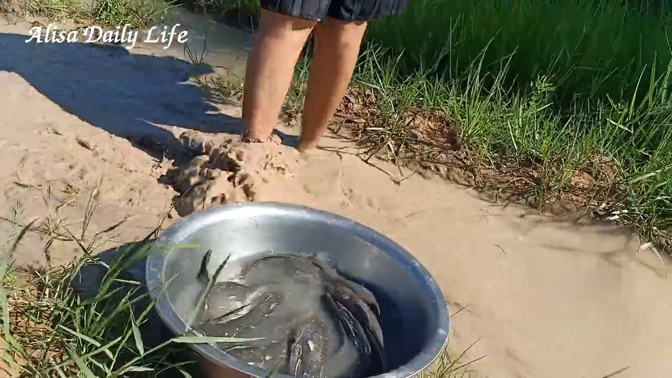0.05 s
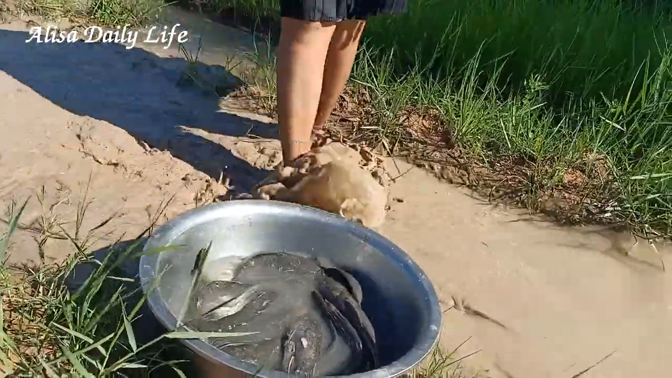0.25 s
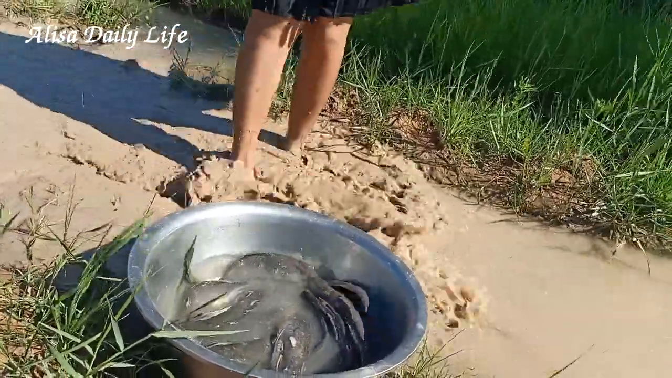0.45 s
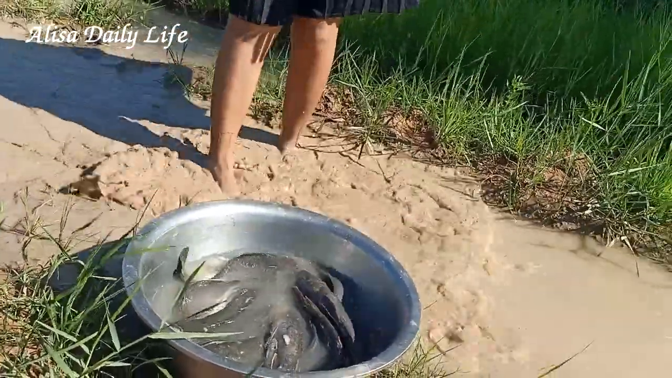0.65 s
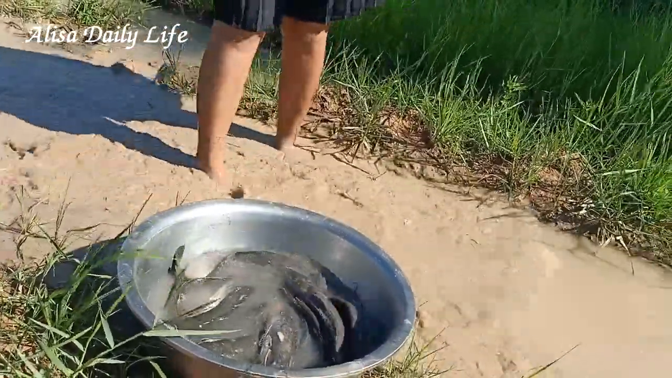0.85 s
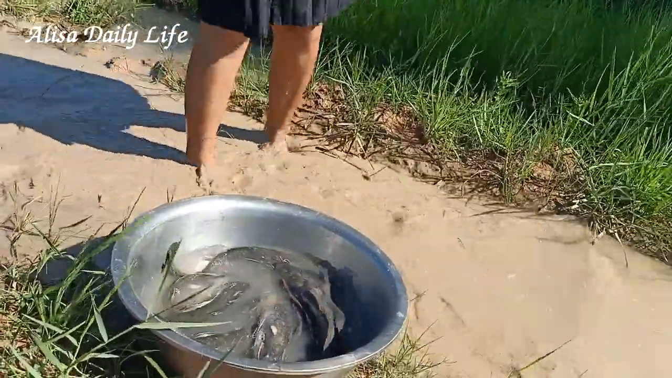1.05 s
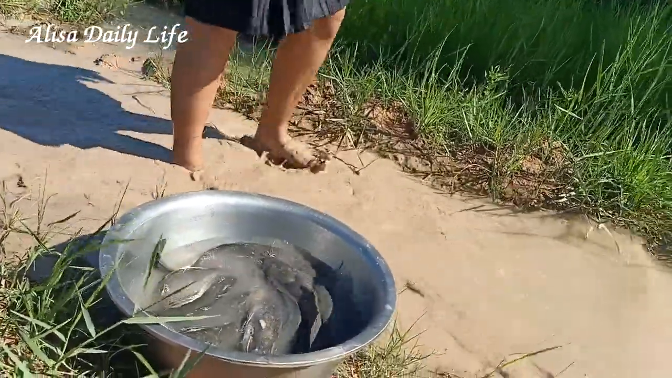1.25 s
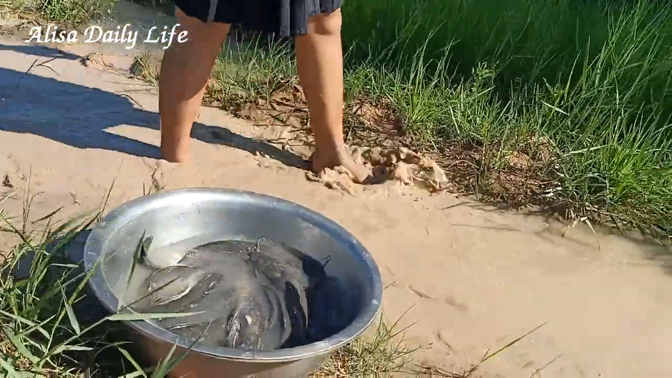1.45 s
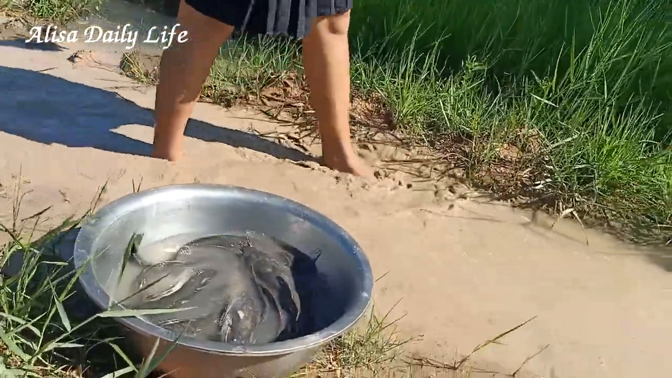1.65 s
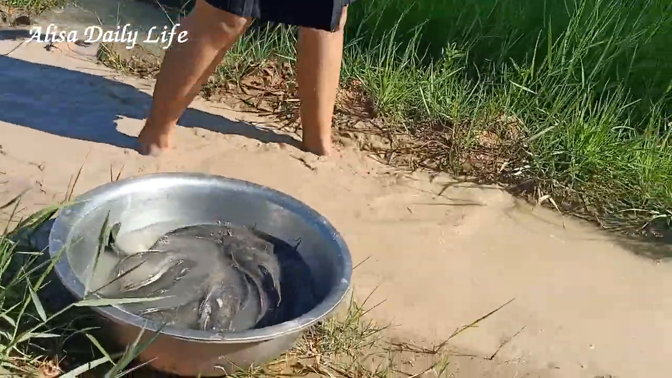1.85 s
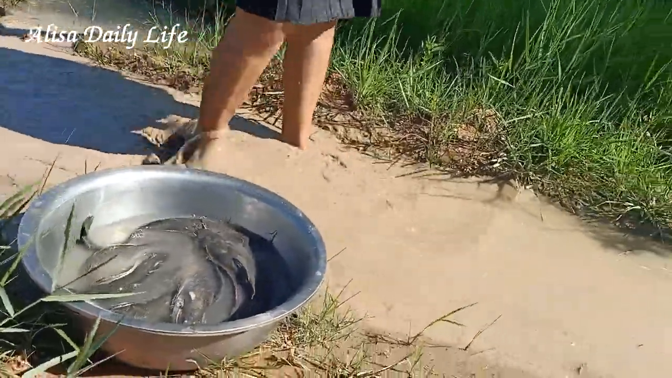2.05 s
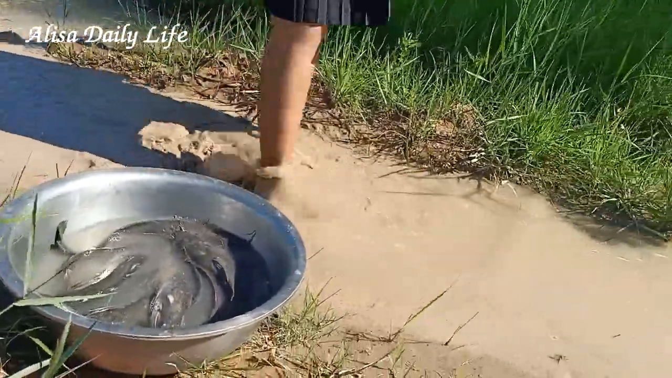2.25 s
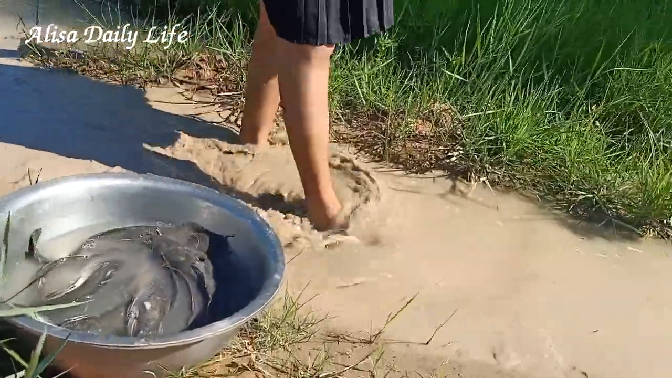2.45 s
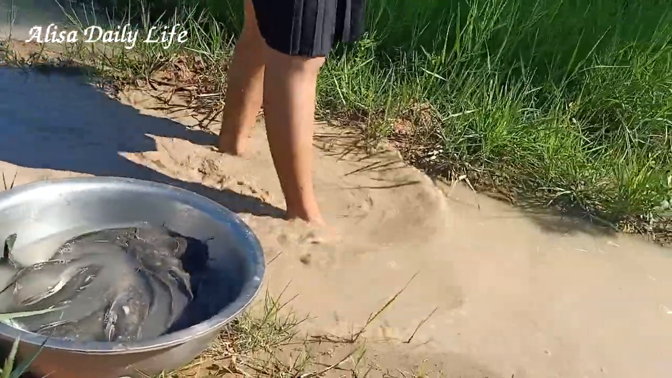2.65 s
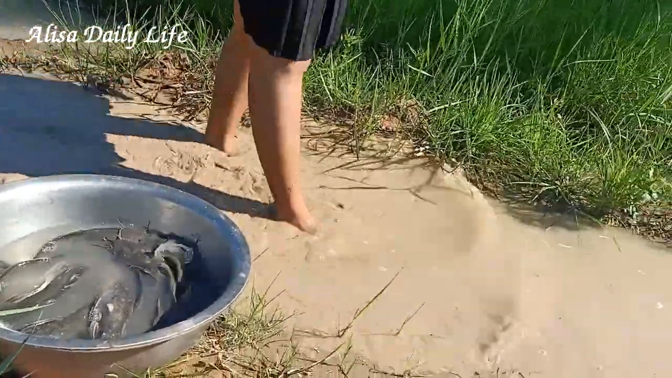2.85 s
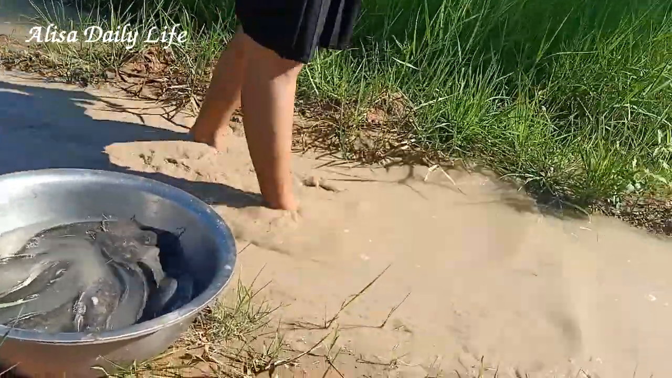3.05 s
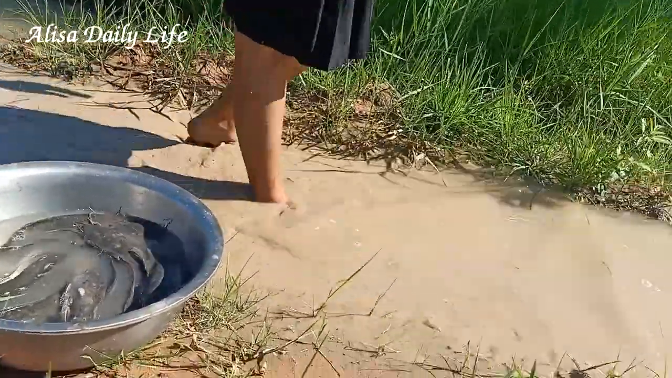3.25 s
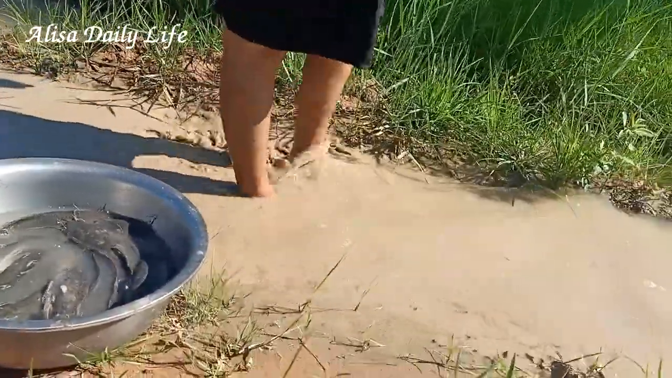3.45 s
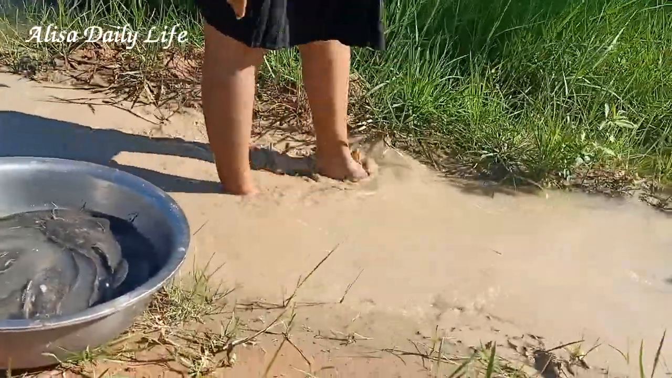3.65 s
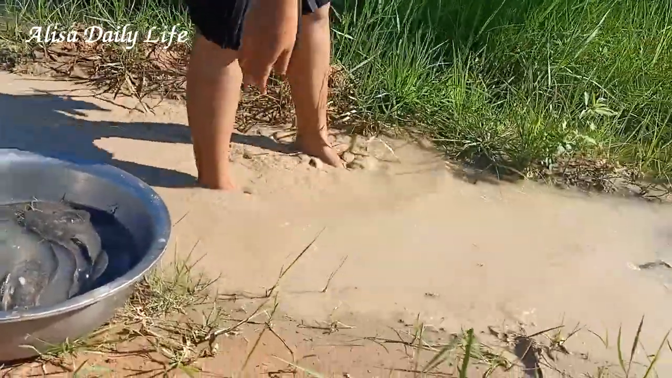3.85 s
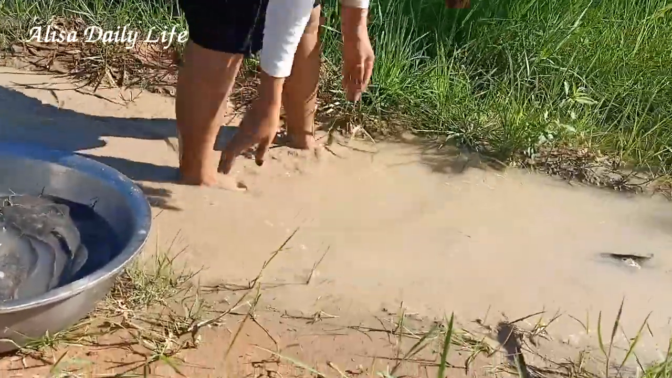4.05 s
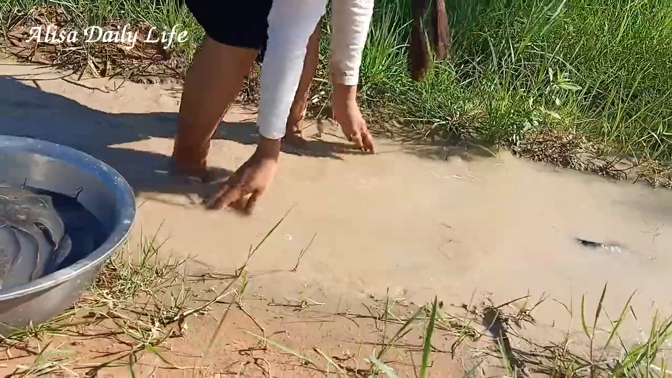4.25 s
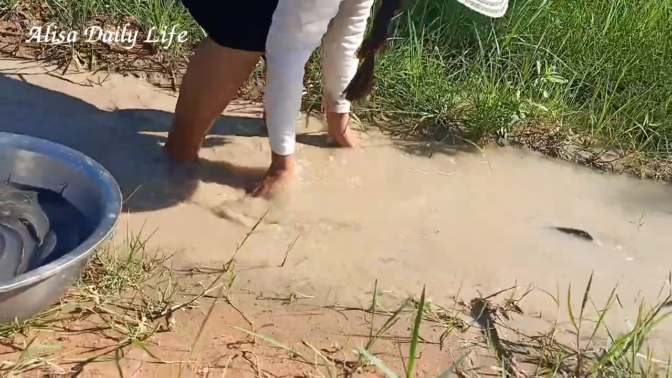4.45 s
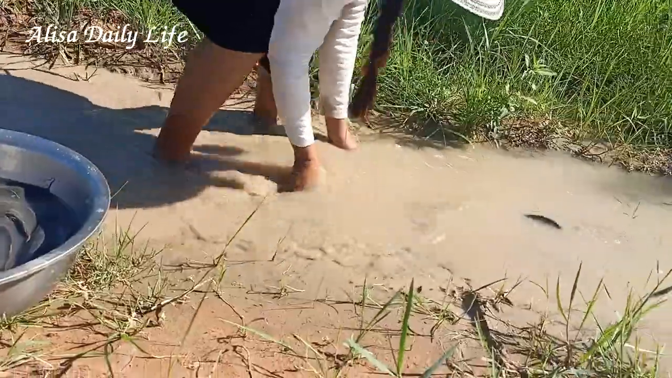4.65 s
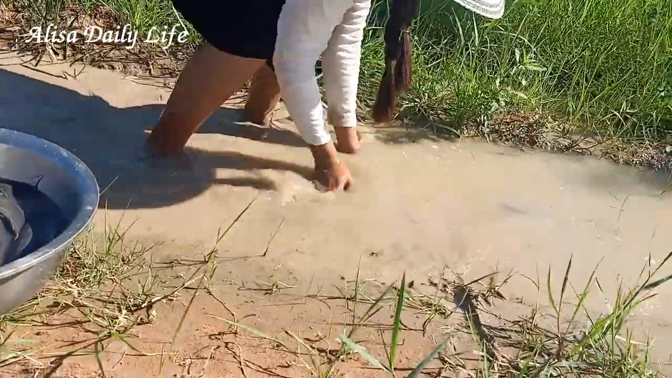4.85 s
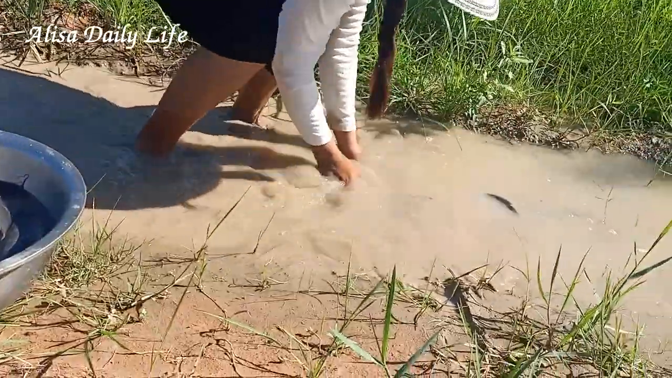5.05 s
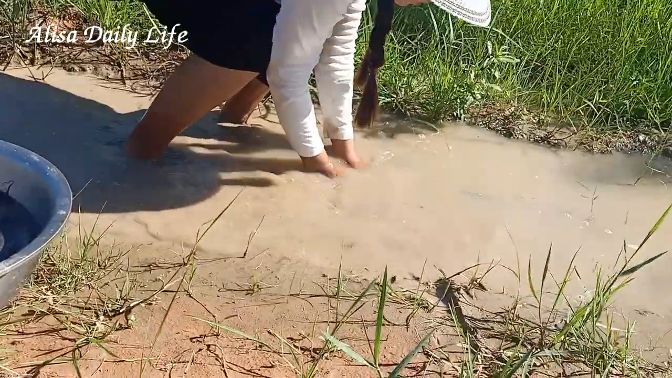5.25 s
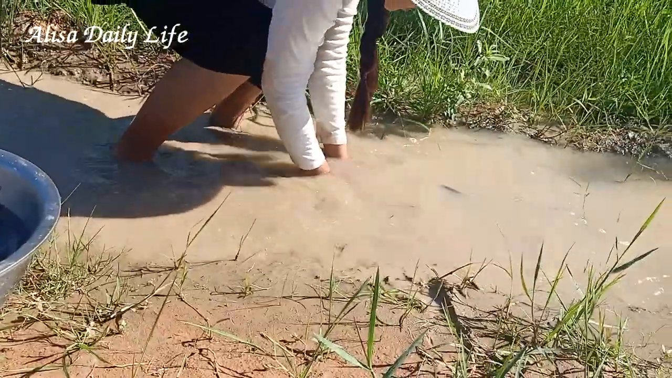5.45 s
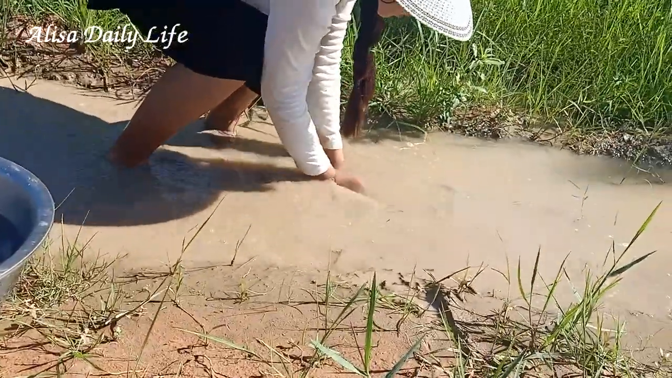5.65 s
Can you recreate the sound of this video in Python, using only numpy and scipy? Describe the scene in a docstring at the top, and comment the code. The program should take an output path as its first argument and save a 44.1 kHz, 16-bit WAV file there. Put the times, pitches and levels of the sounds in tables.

```python
"""Wading in a muddy pool, windy field

Bare feet wade through shallow water, then hands dip in and grope along the bottom.
Strokes swell bubble swarms and noise; plops are rising sine rings, smacks are noise bursts through
resonators, gurgles are sine glides. Random pressure spikes make the wind that buffets the single
microphone, over a filtered-noise background hiss. All of it plays in the right channel only."""
import sys
import numpy as np
from scipy import signal
from scipy.fft import rfft, irfft
from scipy.io import wavfile
from scipy.ndimage import uniform_filter1d

SR = 44100
rng = np.random.default_rng(int(sys.argv[2]) if len(sys.argv) > 2 else 0)


def to_wav(sig):
    """Store sig (one row per channel, or 1-D mono) as 16-bit WAV at the path in sys.argv[1].

    Samples outside -1..1 are clipped; the rate is SR.
    """
    pcm = np.clip(np.atleast_2d(sig), -1, 1) * 32767
    pcm = np.round(pcm).astype(np.int16)
    wavfile.write(sys.argv[1], SR, pcm.T)  # frames by channels


N = 251851
TIME = np.arange(N) / SR  # [s]

# All levels in the tables are mix levels, ahead of layer trims, filters and output gain.


def undb(db):
    """Decibels to gain."""
    return 10 ** (np.asarray(db) / 20)


def unit(x):
    """Scale to rms 1."""
    return x / np.sqrt(np.mean(x ** 2))


def curves(table):
    """Each column of a control table, sample by sample."""
    s, *columns = np.transpose(table)
    return [np.interp(TIME, s, column) for column in columns]


def colour(x, points):
    """Filter by a (frequency [Hz], gain [dB]) outline that falls away steeply beyond its ends."""
    hz, db = np.transpose(points)
    f = np.maximum(np.arange(N // 2 + 1) * SR / N, 1)
    skirts = np.minimum(f / hz[0], 1) ** 3 * np.minimum(hz[-1] / f, 1) ** 4
    gain = undb(np.interp(np.log(f), np.log(hz), db)) * skirts
    return irfft(rfft(x) * gain, N)


def steady(x, span_s):
    """Take out swells slower than span_s, keep the grain."""
    size = max(int(span_s * SR), 1)
    power = uniform_filter1d(uniform_filter1d(x ** 2, size), size)
    return x / np.sqrt(np.abs(power) + 1e-12)


def walk(rate):
    """Smooth random wander with rate new targets a second, spread near 1."""
    k = int(SR / rate)
    steps = np.repeat(rng.standard_normal(N // k + 1), k)
    return unit(uniform_filter1d(steps, k)[:N])


def add(out, s, sound):
    """Mix a short sound in at time s."""
    i = int(np.clip(s * SR, 0, N - 1))
    out[i:i + len(sound)] += sound[:N - i]


def gate(start, end, attack_s, release_s):
    """Swell exponentially up to start, hold until end, die away."""
    return np.exp(np.minimum(TIME - start, 0) / attack_s - np.maximum(TIME - end, 0) / release_s)


# outline of the background hiss: (frequency [Hz], gain [dB])
HISS_COLOUR = [(35, -10), (60, -3), (105, 1.5), (175, -31), (298, -24.5), (1120, -32.5), (2360, -26.5),
               (3270, -31.5), (4420, -34.5), (5840, -23), (7900, -44.5), (9080, -39.5), (9970, -47.5),
               (13500, -44.5), (15500, -46)]


def background_hiss():
    """A faint, nearly even background hiss: filtered noise, levelled by its treble."""
    hiss = colour(rng.standard_normal(N), HISS_COLOUR)
    treble = colour(hiss, [(1000, 0), (15000, 0)])
    return hiss / treble.std() * undb(-62.5 + 0.65 * walk(7.5))


def vortex(hz):
    """A pressure spike between two shallow dips."""
    u = (np.pi * hz * np.arange(-600, 601) / SR) ** 2
    return (1 - 2 * u) * np.exp(-u)


def eddies(count, low_hz, high_hz, spread_db):
    """Vortices of many sizes and either sign pass at random moments."""
    out = np.zeros(N)
    for when, pitch, size, side in rng.random((count, 4)):
        hz = low_hz * (high_hz / low_hz) ** pitch
        db = -spread_db * np.log(size + .05)
        add(out, when * N / SR, np.sign(side - .5) * undb(db) * vortex(hz))
    return unit(out)


# the breeze between gusts, with its lulls: (time [s], level [dB])
BREEZE_LEVEL = [(0, -33.5), (.9, -38), (1.15, -40), (1.4, -38.5), (2.1, -38.5), (2.25, -43.5), (2.7, -43),
                (3.28, -41), (3.31, -66), (3.41, -73), (3.45, -40), (3.9, -47), (4.2, -56), (4.66, -59),
                (4.95, -46), (5.27, -43), (5.31, -79), (5.71, -60)]
# gusts: (start [s], hold [s], level [dB], fine eddies relative to the gust [dB])
GUST_EVENTS = [(.01, 0.068, -25.5, -16), (.14, 0.15, -24, -11), (0.301, .11, -34, -2),
               (0.589, 0.1, -27.5, -6), (0.735, 0.017, -27, -5), (0.838, .09, -31, -4),
               (1.268, .15, -29.5, -9), (1.446, .15, -29.5, -9.5), (1.668, 0.026, -32, -14.5),
               (1.874, 0.021, -25, -15.5), (1.963, 0.18, -31.5, -15.5), (2.28, 0.14, -43, -16),
               (2.457, 0.081, -33, -14), (2.661, 0.052, -29.5, -14.5), (2.805, 0.053, -34.5, -13),
               (3.431, 0.037, -36, -3.5), (3.588, .10, -35, -12.5), (3.789, 0.031, -32, -10),
               (3.883, 0.021, -31, -17), (3.994, 0.12, -42.5, -17.5), (4.718, 0.046, -40, -20.5),
               (4.879, .03, -37.5, -12.5), (4.956, 0.086, -36.5, -14), (5.098, 0.058, -35.5, -19),
               (5.41, 0.043, -34, -21), (5.507, 0.17, -33.5, -9)]


def blowing():
    """Strength of the big and of the fine eddies: gust power rides on the breeze."""
    big = undb(curves(BREEZE_LEVEL)[0]) ** 2
    fine = big * undb(-24) ** 2
    for s, hold, db, fine_db in GUST_EVENTS:
        power = (undb(db) * gate(s, s + hold, attack_s=.012, release_s=.016)) ** 2
        big = big + power
        fine = fine + power * undb(fine_db) ** 2
    return np.sqrt(big), np.sqrt(fine)


# outline of the big-eddy rumble: (frequency [Hz], gain [dB])
RUMBLE_COLOUR = [(15, -48), (25, -23), (46, -4.5), (65, 0.5), (130, -1), (174, -4), (243, -6.5),
                 (354, -15.5), (390, -16), (442, -32), (700, -51), (910, -94), (1540, -120)]
# single hard eddies: (centre time [s], level [dB], pitch [Hz])
BUFFET_EVENTS = [(0.0218, -20, 233), (0.1617, -10.5, 343), (0.1735, -11, 221), (0.2517, -19, 133),
                 (.632, -14, 120), (0.639, -20.5, 447), (0.663, -15, 500), (0.6733, -12, 343),
                 (.742, -21, 402), (0.838, -13, 386), (0.886, -25.5, 406), (0.8941, -15, 185.4),
                 (1.276, -24.5, 367), (1.3402, -17.5, 250), (1.4908, -20.5, 445), (1.544, -26.5, 394),
                 (1.5928, -25, 150), (1.6968, -23.5, 213), (1.8955, -18.5, 89), (2.1203, -19.5, 218),
                 (2.5125, -30, 320), (2.6801, -23, 318), (2.688, -26.5, 390), (3.1156, -19.5, 164),
                 (3.481, -23.5, 186), (3.791, -30, 206), (3.902, -21, 204), (4.975, -22, 217),
                 (5.0131, -21.5, 293), (5.5073, -19, 180), (5.55, -36, 494), (5.593, -31.5, 378),
                 (5.6451, -19, 203)]


def wind():
    """Big eddies rumble on the microphone; small ones flutter over them; the hardest are single thuds."""
    big, fine = blowing()
    rumble = eddies(count=1500, low_hz=87.6, high_hz=265, spread_db=3.5)
    rumble = steady(colour(rumble, RUMBLE_COLOUR), 0.024)
    flutter = eddies(count=1500, low_hz=171, high_hz=374, spread_db=8)
    flutter = colour(flutter, [(200, -11.5), (330, -1), (500, 1.0), (700, -2.0), (1200, 0)])
    flutter = steady(flutter, 0.11)
    out = undb(0.94) * big * rumble + undb(-1.5) * fine * flutter
    for s, db, hz in BUFFET_EVENTS:
        thud = vortex(hz)
        add(out, s - len(thud) / 2 / SR, undb(db - 0.5) * thud)
    return out


def stroke(start, crest, end, shape):
    """A wave builds to its crest, sags and collapses, leaving a wake that settles slowly."""
    climb_db, sag_db, wake_db, wake_s = shape
    wave_db = np.interp(TIME, [start, crest, end], [-climb_db, 0, -sag_db])
    wave = undb(wave_db) * gate(start, end, attack_s=.02, release_s=.051)
    wake = undb(wake_db) * gate(start, end, attack_s=.095, release_s=wake_s)
    return np.hypot(wave, wake)


# a leg or hand sweeps through the water:
# (start [s], crest [s], end [s], churn level [dB], spray level [dB], finest-droplet mist level [dB])
STROKE_EVENTS = [(0.014, 0.039, 0.22, -42, -44, -57), (0.204, 0.355, 0.54, -34.5, -40.5, -51),
                 (1.361, 1.611, 1.76, -48, -47.5, -59.5), (2.174, 2.343, 2.506, -42, -46.5, -59),
                 (2.805, 2.896, 2.99, -57.5, -55.5, -71), (3.189, 3.27, 3.4, -53.5, -64, -77.5),
                 (3.417, 3.514, 3.67, -44, -50, -62.5), (4.363, 4.39, 4.43, -59.5, -51, -63),
                 (4.518, 4.58, 4.62, -62.5, -72, -79), (4.778, 4.8, 4.82, -54.5, -61, -82)]
# stroke shapes: (climb to crest [dB], sag after crest [dB], wake level [dB], wake decay constant [s])
CHURN_STROKE = (7, 5, -11, 0.4056)
SPRAY_STROKE = (6.5, 4.5, -12, 0.34)
MIST_STROKE = (12, 3.5, -11.5, .5)
CHURN_LAG_S = .025  # the churn peaks after the spray, as the wave falls back
SURGE_DB, SURGE_RATE = 1.2, 22  # the water moves unevenly (spread [dB], new targets per s)


def stirring():
    """Levels of churn, spray and mist in dB: the powers of all strokes add, under one shared surge."""
    power = 1e-12
    for start, crest, end, churn_db, spray_db, mist_db in STROKE_EVENTS:
        churn_crest = min(crest + CHURN_LAG_S, end)
        churn = undb(churn_db) * stroke(start, churn_crest, end, CHURN_STROKE)
        spray = undb(spray_db) * stroke(start, crest, end, SPRAY_STROKE)
        mist = undb(mist_db) * stroke(start, crest, end, MIST_STROKE)
        power = power + np.array([churn, spray, mist]) ** 2
    return 10 * np.log10(power) + SURGE_DB * walk(SURGE_RATE)


def bubble(hz, t60, rise):
    """A ring that swells within a cycle, then dies while its pitch climbs toward the surface."""
    t = np.arange(int(t60 * SR) + 2) / SR
    envelope = (1 - np.exp(-2 * hz * t)) * np.exp(-np.log(1000) * t / t60)
    # pitch climbs by the fraction rise over t60
    return np.sin(2 * np.pi * hz * t * (1 + rise * t / t60 / 2)) * envelope


def swarm(stir_db, count, low_hz, high_hz, cycles, spread_db, rise):
    """Bubbles at random moments, a crowd in stirred water and few in calm; spread_db sets how some stand out."""
    out = np.zeros(N)
    chance = undb(.7 * (stir_db - stir_db.max()))
    for when, pitch, size, ring, luck in rng.random((count, 5)):
        if luck < chance[int(when * N)]:
            hz = low_hz * (high_hz / low_hz) ** pitch
            db = -spread_db * np.log(size + .03)
            t60 = cycles * (.5 + ring) / hz
            add(out, when * N / SR, undb(db) * bubble(hz, t60, rise))
    # lift the sparse stretches, so crowding changes grain more than level
    return unit(out * np.maximum(chance, .1) ** -.5)


# outlines of the three water layers: (frequency [Hz], gain [dB])
CHURN_OUTLINE = [(350, -3), (540, -5.5), (900, -2), (1200, -3), (1500, -4), (2100, 1.5), (2800, 3),
                 (3300, -3), (4500, 1.5)]
SPRAY_OUTLINE = [(2200, 4.5), (3200, -10), (4200, -7), (5000, -6.5), (5800, 4.5), (6500, -5), (7500, -14),
                 (10000, -21)]
MIST_OUTLINE = [(6000, 10.5), (8000, -5), (10500, -7), (12500, -2), (13800, -1), (15500, 0)]


def slosh():
    """The wave ahead of each leg churns up bubbles; its spray patters back as tiny ones over a fine hiss."""
    churn_db, spray_db, mist_db = stirring()
    foam = rng.standard_normal((3, N))
    churn = swarm(churn_db, count=16000, low_hz=480, high_hz=3600, cycles=26, spread_db=4.5, rise=.2)
    spray = swarm(spray_db, count=14000, low_hz=2898, high_hz=7830, cycles=52, spread_db=6.0, rise=0.096)
    mist = swarm(mist_db, count=6000, low_hz=7100, high_hz=15100, cycles=23, spread_db=0.5, rise=0.066)
    churn = steady(colour(churn + undb(-6) * foam[0], CHURN_OUTLINE), 0.051)
    spray = steady(colour(spray + undb(1) * foam[1], SPRAY_OUTLINE), 0.054)
    mist = steady(colour(mist + undb(1.5) * foam[2], MIST_OUTLINE), 0.025)
    return undb(churn_db - 2.54) * churn + undb(spray_db - 2.0) * spray + undb(mist_db) * mist


# trapped air bubbles: (time [s], starting pitch [Hz], level [dB], 60 dB decay [s])
PLOP_EVENTS = [(0.034, 1766, -32.5, 0.025), (0.2358, 940, -25.5, 0.039), (0.361, 1160, -25, 0.051),
               (.37, 2110, -29.5, .035), (.415, 5900, -32, 0.019), (.445, 890, -27.5, 0.028),
               (.482, 882, -27, 0.037), (0.487, 2030, -39, .061), (.545, 957, -35.5, 0.057),
               (0.573, 2590, -30.5, .024), (0.7988, 1960, -36.5, 0.012), (0.972, 2200, -36, 0.023),
               (1.003, 1810, -26, 0.013), (1.034, 773, -33.5, 0.038), (1.208, 1660, -40, 0.012),
               (1.3626, 1660, -29.5, 0.015), (1.546, 5200, -33, 0.015), (1.558, 2530, -34.5, 0.021),
               (1.578, 960, -37.5, .056), (1.6564, 2720, -27, 0.012), (1.658, 2180, -31, 0.015),
               (2.1007, 3690, -37, .017), (2.1878, 2530, -37, .031), (2.206, 1140, -33.5, 0.027),
               (2.241, 1180, -27.5, .025), (2.326, 1230, -34, .027), (2.361, 2440, -33.5, 0.019),
               (2.379, 1920, -34.5, 0.027), (2.384, 770, -35, 0.11), (2.459, 1130, -37, .046),
               (2.51, 786, -34, 0.042), (2.51, 1860, -35, 0.028), (2.525, 1210, -38.5, 0.056),
               (2.597, 795, -38.5, 0.027), (2.632, 2550, -39, 0.021), (2.7978, 2750, -17, 0.016),
               (2.91, 1870, -38, .025), (3.312, 900, -35, 0.015), (3.36, 650, -28, 0.028),
               (3.413, 1190, -36, .03), (3.429, 1610, -35.5, .024), (3.464, 1390, -39, .039),
               (3.5994, 2460, -27, 0.013), (3.602, 840, -29, .022), (3.8476, 2460, -32, .016),
               (4.393, 1590, -32.5, 0.015), (4.3918, 2560, -32, 0.011), (4.467, 980, -45, 0.047),
               (4.516, 660, -39.5, 0.032), (4.8, 1710, -38.5, 0.019), (4.832, 1070, -35, 0.014),
               (4.9448, 1275, -41.5, .048)]


def plops():
    """Single large bubbles ring out of the churn."""
    out = np.zeros(N)
    for s, hz, db, t60 in PLOP_EVENTS:
        add(out, s, undb(db) * bubble(hz, t60, rise=0.12))
    return out


# wet smacks of mud and skin:
# (time [s], level [dB], resonance centre [Hz], resonator width [Hz], 60 dB decay of the tear [s])
SMACK_EVENTS = [(0.733, -25.5, 5860, 1500, 0.0062), (.743, -25.5, 5270, 2480, 0.013),
                (0.7482, -24, 5600, 1480, 0.013), (0.7728, -33.5, 7040, 3980, 0.01),
                (0.9676, -38.5, 3500, 4000, 0.03), (1.2925, -36.5, 5800, 4000, 0.0093),
                (1.322, -38, 2630, 2500, 0.068), (1.3623, -28.5, 2880, 4120, 0.014),
                (2.1398, -36.5, 5460, 2500, 0.052), (2.243, -30, 3140, 2500, 0.017),
                (2.7972, -28, 2400, 1590, 0.0087), (2.903, -36, 2600, 2900, 0.06),
                (3.1873, -38, 1660, 2770, 0.041), (3.362, -31.5, 4630, 1990, 0.011),
                (3.364, -26, 4900, 3500, 0.012), (3.577, -34.5, 4940, 3020, 0.018),
                (3.76, -33, 4640, 2800, 0.043), (3.976, -41.5, 8000, 6000, .012),
                (4.3747, -33.5, 3460, 3020, 0.015), (4.392, -31, 3700, 4560, 0.019),
                (4.406, -38, 3800, 3000, 0.015), (4.417, -43.5, 2270, 2480, 0.025),
                (4.515, -39.5, 3085, 2500, 0.014), (4.5576, -40.5, 3480, 4000, 0.034),
                (4.575, -35, 4500, 6030, 0.018), (4.733, -38.5, 6000, 1900, 0.0081),
                (4.787, -32.5, 4440, 5100, 0.0089), (4.834, -43, 2780, 2010, 0.035),
                (5.01, -42.5, 4570, 2000, 0.011)]


def smacks():
    """A wet film tears: a short noise burst rings the gap behind it."""
    out = np.zeros(N)
    t = np.arange(4096) / SR
    for s, db, hz, width_hz, t60 in SMACK_EVENTS:
        gap = signal.iirpeak(hz, hz / width_hz, fs=SR)
        envelope = np.exp(-np.log(1000) * t / t60) * (1 - np.exp(-t / .0008))
        tear = rng.standard_normal(len(t)) * envelope
        ring = signal.lfilter(*gap, tear)
        burst = signal.lfilter(*gap, ring) + 0.51 * ring
        add(out, s, undb(db) * burst / np.abs(burst).max())
    return colour(out, [(400, 18.5), (3000, -2), (6200, -0.5), (8500, -7.0), (16000, -7.0)])


# hollows that close and rise in pitch: (time [s], length [s], first pitch [Hz], last pitch [Hz], level [dB])
GURGLE_EVENTS = [(3.503, .045, 540, 950, -40), (3.998, .064, 630, 2100, -46), (4.333, .052, 680, 1500, -51),
                 (4.515, .04, 630, 720, -56), (4.792, .06, 530, 1500, -50), (4.815, .06, 570, 720, -53),
                 (4.85, .04, 950, 1050, -55), (4.965, .04, 950, 1400, -54)]


def gurgles():
    """Water fills a hollow round a hand or heel; the shrinking pocket sings upward, ever faster."""
    out = np.zeros(N)
    flutter = undb(4 * walk(260) - 3)
    for s, length, first_hz, last_hz, db in GURGLE_EVENTS:
        u = np.linspace(0, 1, int(length * SR))
        hz = first_hz * (last_hz / first_hz) ** (u ** 2)
        swell = np.abs(np.sin(np.pi * u)) ** .5
        add(out, s, undb(db) * swell * np.sin(2 * np.pi * np.cumsum(hz) / SR))
    return out * flutter


def scene():
    """Water sounds scatter faintly off the bank; the wind is right at the microphone."""
    water = slosh() + plops() + smacks() + gurgles()
    t = np.arange(SR // 5) / SR
    scatter = rng.standard_normal(len(t)) * np.exp(-t / .005) * (t > .003)
    bank = signal.fftconvolve(water, scatter / np.linalg.norm(scatter))[:N]
    sound = background_hiss() + wind() + water + undb(-14) * bank
    return np.outer([0, 2], sound)  # left silent, right at double gain


TOP_HZ = 15800


def record(dry):
    """A steep elliptic low-pass cuts the top."""
    return signal.sosfilt(signal.ellip(10, .2, 80, TOP_HZ, fs=SR, output="sos"), dry)


dry = scene()
out = record(dry)
to_wav(out)
```